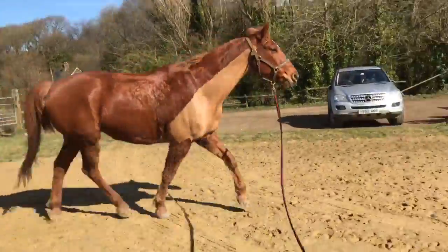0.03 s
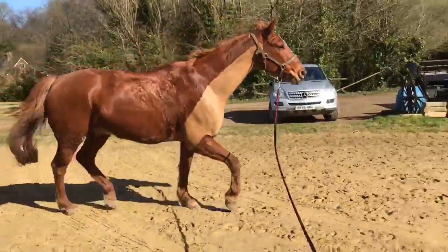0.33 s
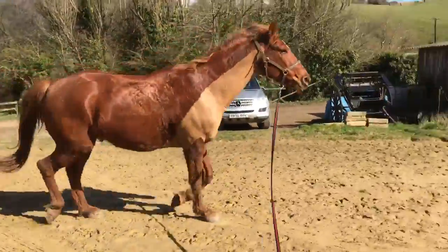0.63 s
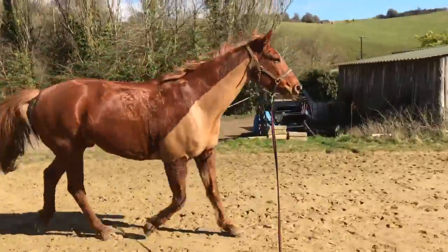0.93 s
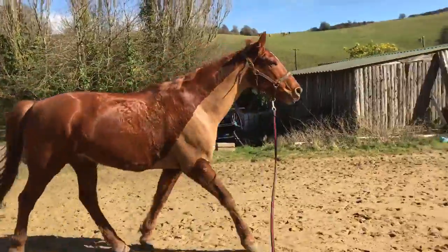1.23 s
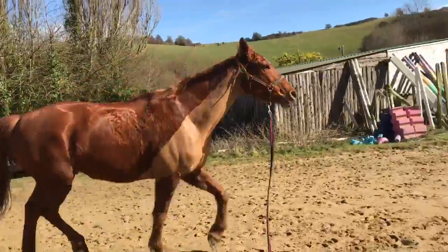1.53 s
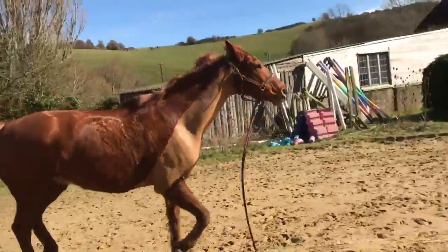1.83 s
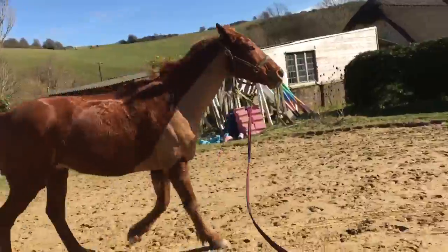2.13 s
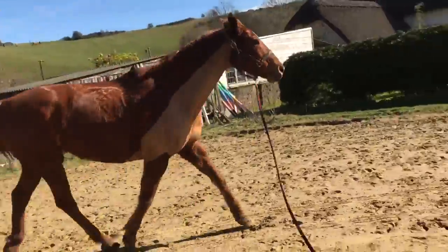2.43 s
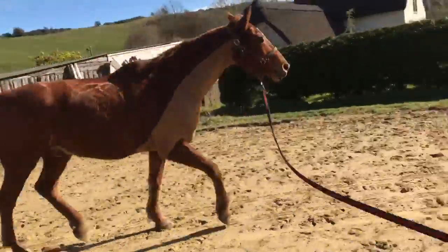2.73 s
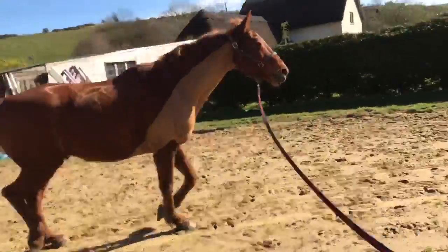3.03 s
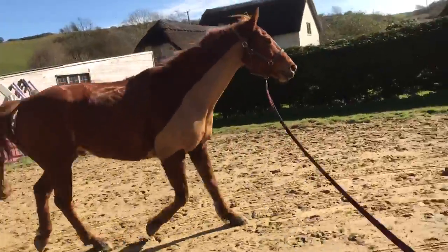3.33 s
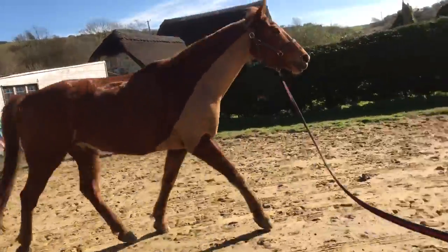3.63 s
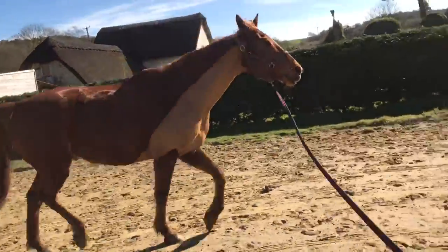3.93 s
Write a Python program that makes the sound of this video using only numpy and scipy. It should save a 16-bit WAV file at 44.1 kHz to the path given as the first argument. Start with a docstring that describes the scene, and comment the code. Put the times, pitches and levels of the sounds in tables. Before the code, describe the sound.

A horse trots on sand close by, over faint outdoor hiss and a low breeze. From 0.3 seconds its hooves land about every 0.4 seconds with soft dull thuds and crunches, with scuffs and pattering sand between. Wind rumbles on the microphone, thumping harder from 1.6 seconds and strongest near the end, at about 4 seconds. A small bird chirps once, faintly, at 2.6 seconds.

```python
"""A horse trots round a sand arena close by. From the start there is outdoor hiss and a low breeze.
Grit clicks, a hoof scuffs and faint far calls begin. From 0.3 s the hooves land with a dull thud and
a crunch, kicked sand falls back, and gusts rumble on the microphone, thumping harder from 1.6 s.
At 2.6 s a small bird chirps once. The wind is strongest near the end, as the horse trots on."""
import sys
import numpy as np
from scipy import signal
from scipy.fft import rfft, irfft, next_fast_len
from scipy.io import wavfile
from scipy.ndimage import uniform_filter1d, map_coordinates

SR = 44100
rng = np.random.default_rng(int(sys.argv[2]) if len(sys.argv) > 2 else 0)


def file_out(sig):
    """Save sig as 16-bit WAV at sys.argv[1]."""
    # one column per channel
    cols = np.atleast_2d(sig).T
    # limit, then scale
    lim = np.clip(cols, -1, 1)
    pcm = np.round(lim * 32767).astype(np.int16)
    wavfile.write(sys.argv[1], SR, pcm)


N = 176400  # 4 seconds
TIME = np.arange(N) / SR


def amp(db):
    """Turn decibels into a number to multiply by."""
    return 10 ** (np.asarray(db) / 20)


def unit(x):
    """Scale a sound to an average (rms) strength of 1."""
    return x / np.sqrt(np.mean(x ** 2) + 1e-20)


def filtered(x, response):
    """Turn each frequency up or down by response(hz)."""
    size = next_fast_len(N + 8192)
    return irfft(rfft(x, size) * response(np.fft.rfftfreq(size, 1 / SR)), size)[:N]


def coloured(x, tone):
    """Shape a sound with a tone table, at strength 1."""
    freqs, db = np.transpose(tone)
    return unit(filtered(x, lambda hz: amp(np.interp(np.log(hz + 1), np.log(freqs + 1), db))))


def noise(tone):
    """Noise with the given tone, at strength 1."""
    return coloured(rng.standard_normal(N), tone)


def wobble(rate):
    """A smooth curve through `rate` random values a second."""
    return map_coordinates(rng.standard_normal(int(N * rate / SR) + 4), [TIME * rate])


def steadied(x, samples):
    """Even out the chance swells in a noise."""
    power = uniform_filter1d(uniform_filter1d(x * x, samples), samples)
    return x / np.sqrt(np.abs(power) + 1e-9)


def swells(rows):
    """A loudness curve of smooth humps (middle [s], length [s], level [dB])."""
    power = np.zeros(N)
    for middle, length, db in rows:
        near = slice(*np.searchsorted(TIME, [middle - 2 * length, middle + 2 * length]))
        power[near] += amp(db) ** 2 * .5 ** ((2 * (TIME[near] - middle) / length) ** 2)
    return np.sqrt(power)


def strikes(rows, rise_s, hold_share=0.55):
    """A loudness curve of hits (start [s], fade time [s], level [dB]) that rise, hold and fade."""
    loudness = np.zeros(N)
    for start, fade_s, db in rows:
        near = slice(*np.searchsorted(TIME, [start, start + 10 * fade_s]))
        age = TIME[near] - start
        fade = np.exp(-np.maximum(age / fade_s - hold_share, 0))
        loudness[near] += amp(db) * np.minimum(age / rise_s, 1) * fade
    return loudness


# how loud the outdoor hiss is (time [s], level [dB])
HISS_LEVEL = [(0, -61.5), (.3, -66), (.48, -66), (.7, -58.5), (.85, -68), (1.2, -66.5), (1.6, -62),
              (2, -65.5), (2.4, -64), (2.8, -65), (3.2, -61), (3.57, -62.5), (3.93, -61.5)]
# the tone of the hiss (frequency [Hz], level [dB])
HISS_TONE = [(290, 7), (500, 1), (839, -1.5), (1200, 5.5), (2570, -3), (3960, -3.5), (4910, -9.5),
             (8850, -11), (10500, -15.5), (12700, -14.5), (15500, -11.5)]

def outdoor_hiss(drift_db=2.87):
    """A soft hiss whose level wanders a little."""
    hiss = noise([(50, -10)] + list(HISS_TONE))
    return hiss * amp(np.interp(TIME, *np.transpose(HISS_LEVEL)) + drift_db * wobble(3.98))


# how strong the breeze is (time [s], level [dB])
BREEZE = [(0, -61.5), (.3, -52.5), (.7, -54.5), (1.1, -50.5), (1.5, -51), (1.8, -47), (2, -56),
          (2.4, -48.5), (2.7, -46), (3.05, -45.5), (3.4, -47), (3.6, -52.5), (3.7, -30.5), (4, -57)]
# gusts on the microphone (middle [s], length [s], rumble [dB], flutter [dB])
GUSTS = [(0.301, 0.035, -41, -44.5), (0.554, 0.027, -48, -52), (.853, 0.04, -41, -53.5),
         (0.895, 0.015, -42, -46.5), (0.946, 0.034, -46, -54), (1.213, 0.029, -37.5, -77),
         (1.264, 0.016, -37.5, -49), (1.573, 0.0073, -45, -31), (1.608, 0.022, -29.5, -35.5),
         (1.664, 0.021, -35.5, -39.5), (1.72, 0.031, -31.5, -46), (2.132, 0.13, -43, -79),
         (2.188, 0.021, -40.5, -49), (2.241, 0.022, -30, -43), (2.305, 0.02, -31.5, -58),
         (2.465, 0.056, -41.5, -52), (2.539, 0.015, -35.5, -38.5), (2.582, 0.036, -29, -39.5),
         (2.74, 0.012, -27, -42.5), (2.785, 0.046, -37, -59), (2.851, 0.035, -31.5, -43),
         (2.932, 0.031, -32, -43.5), (3.166, 0.017, -28, -40), (3.218, 0.031, -31, -72),
         (3.287, 0.023, -33.5, -69), (3.358, 0.023, -43, -37.5), (3.412, 0.047, -32.5, -36),
         (3.477, 0.033, -34.5, -61), (3.534, 0.014, -40.5, -42.5), (3.633, 0.02, -38, -52.5),
         (3.695, 0.012, -29, -31.5), (3.747, 0.024, -35.5, -54), (3.829, 0.031, -25, -37),
         (3.943, 0.039, -39, -54), (4.007, 0.049, -35, -39.5)]
# the tone of the wind's rumble (frequency [Hz], level [dB])
RUMBLE_TONE = [(15, -26), (26, -48), (42, 1), (63, 4.5), (120, -4.5), (200, -17.5), (400, -32.5),
               (800, -46.5), (2000, -78)]
# the tone of its flutter (frequency [Hz], level [dB])
FLUTTER_TONE = [(50, -32), (120, 3), (200, 9.5), (330, -6.5), (550, -18.5), (850, -33), (1500, -78),
                (4000, -77)]

def wind(roughness_db=7, breeze_flutter_db=-13):
    """Air rumbles on the microphone, with a rough, higher flutter when it hits hard."""
    breeze = amp(np.interp(TIME, *np.transpose(BREEZE)))
    gust_rumble = swells([row[:3] for row in GUSTS])
    gust_flutter = swells([(middle, length, db) for middle, length, _, db in GUSTS])
    rumble = np.hypot(breeze, gust_rumble) * steadied(noise(RUMBLE_TONE), samples=1000)
    churn = steadied(noise(FLUTTER_TONE) * amp(roughness_db * wobble(130)), samples=700)
    return rumble + np.hypot(amp(breeze_flutter_db) * breeze, gust_flutter) * churn


# small clicks (time [s], level [dB], pitch [Hz], time to fade by 60 dB [s], pitch sharpness [Q])
CLICKS = [(0.0228, -51, 3730, 0.017, 2), (.047, -60, 6100, 0.083, 2.6), (0.8053, -55, 6000, 0.018, 1),
          (1.1426, -41.5, 3350, 0.022, 3.6), (1.297, -38.5, 6030, 0.0058, 1.2), (1.58, -54, 5000, 0.013, 1),
          (2.816, -54, 9000, 0.019, 0.98), (2.858, -59, 9000, 0.0086, 1.5), (3.99, -54, 4720, .015, 1.2)]

def clicks():
    """Bits of grit and riding gear tap: each is a tiny burst of noise around one pitch."""
    out, age = np.zeros(N + SR), TIME[:2048]
    for start, db, hz, fade_s, sharpness in CLICKS:
        b, a = signal.iirpeak(hz, max(sharpness, 1), SR)
        ring = unit(signal.lfilter(b, a, rng.standard_normal(len(age))))
        out[round(start * SR):][:len(age)] += amp(db - 60 * age / fade_s) * ring
    return out[:N]


def grit(tone, grains_per_s=2200, spread_db=4):
    """Sand grains of uneven size rub together, over an equally strong hiss."""
    hits = (rng.random(N) < grains_per_s / SR) * rng.standard_normal(N)
    sizes = amp(spread_db * np.minimum(rng.exponential(size=N), np.pi))
    return coloured(unit(hits * sizes) + rng.standard_normal(N), tone)


# the tone of loose sand (frequency [Hz], level [dB])
SAND_TONE = [(200, -19), (700, 4.5), (1500, -1), (3600, 4), (6000, 1), (9000, -2), (10400, -9),
             (12500, -2.5), (15500, -11.5)]

def moving_sand(rows, loudness, split_hz=4200):
    """Loose grains follow a loudness curve; finer sand has more treble."""
    grains = grit(SAND_TONE)
    coarse = filtered(grains, lambda hz: 1 / (1 + (hz / split_hz) ** 4))
    fine_rows = [(time, length, db + treble) for time, length, db, treble in rows]
    return coarse * loudness([row[:3] for row in rows]) + (grains - coarse) * loudness(fine_rows)


# hooves dragging (middle [s], length [s], level [dB], extra treble [dB])
SCUFFS = [(.15, 0.056, -56, -6), (.255, 0.047, -62, 4), (.46, 0.17, -75, 7.5), (.565, 0.045, -55.5, -3),
          (.66, 0.053, -54.5, -0.5), (.74, 0.025, -60, 0), (.945, 0.053, -52.5, -7.5),
          (1.025, 0.031, -59, 6), (1.11, 0.065, -58.5, -2.5), (1.2, 0.07, -69, 9), (1.36, .06, -61, -1),
          (1.428, 0.013, -54.5, -2), (1.715, 0.049, -53, -7), (1.822, 0.038, -59, 2.5),
          (2.135, 0.029, -55.5, 1), (2.228, 0.059, -54, -4.5), (2.51, 0.046, -51.5, -10),
          (2.61, 0.049, -57, -0.5), (2.71, 0.049, -58.5, -5.5), (2.94, 0.047, -56, -4.5),
          (3.02, 0.051, -59, 0), (3.1, 0.022, -55, 0), (3.33, 0.059, -54, -7.5), (3.42, 0.025, -59, 0.5),
          (3.66, 0.072, -60, -2), (3.715, .035, -54.5, -16), (3.77, 0.028, -57.5, -3),
          (3.816, 0.022, -60, 8)]

def scuffs():
    """A hoof drags through the sand, so the rubbing swells and fades."""
    return moving_sand(SCUFFS, swells)


# faint calls (middle [s], length [s], pitch [Hz], level [dB])
FAR_CALLS = [(0.153, 0.02, 3000, -61), (0.497, .09, 1460, -68.5), (.87, 0.034, 2850, -75),
             (1.14, 0.1, 2140, -67), (1.29, 0.1, 1810, -68.5), (2.33, 0.29, 1560, -65),
             (2.552, .1, 1430, -68), (3.202, 0.064, 1860, -63), (3.235, 0.035, 1580, -66.5),
             (3.357, 0.045, 970, -61.5), (3.694, 0.037, 1900, -59)]

def far_calls(width_share=.15):
    """Distance blurs each call into a swell of noise around its pitch."""
    out = np.zeros(N)
    for middle, length, pitch, db in FAR_CALLS:
        hiss = rng.standard_normal(N)
        band = filtered(hiss, lambda hz: 1 / (1 + ((hz / pitch - 1) / width_share) ** 2) ** 2)
        out += swells([(middle, length, db)]) * unit(band)
    return out


# hooves landing (start [s], fade time [s], thud [dB], crunch [dB])
HOOVES = [(0.277, 0.011, -46, -45.5), (.391, 0.0063, -53, -65), (.645, 0.011, -49.5, -68),
          (0.682, 0.0044, -45, -53), (1.034, 0.013, -45, -54.5), (1.435, 0.009, -37, -47),
          (1.799, 0.026, -55, -61.5), (2.231, 0.011, -37.5, -43), (2.626, 0.011, -52.5, -62),
          (2.997, 0.0086, -43, -49), (3.404, 0.02, -50, -60), (3.813, 0.0091, -45, -48)]
# the tone of the thud (frequency [Hz], level [dB])
THUD_TONE = [(30, -38), (80, -11), (200, 12), (450, 2.5), (750, 2.5), (1200, -11.5), (2500, -51),
             (8000, -53)]
# the tone of the crunch (frequency [Hz], level [dB])
CRUNCH_TONE = [(200, -53), (700, 0.5), (1500, -1.5), (2500, -1.5), (4000, -0.5), (7500, -9), (10500, -11.5),
               (15000, -21.5)]

def footfalls(rise_s=0.0037):
    """Each hoof packs the ground with a dull thud and crunches the sand."""
    thuds = strikes([row[:3] for row in HOOVES], rise_s)
    crunches = strikes([(start, fade_s, db) for start, fade_s, _, db in HOOVES], rise_s)
    return thuds * steadied(noise(THUD_TONE), samples=400) + crunches * grit(CRUNCH_TONE)


# sand landing (start [s], fade time [s], level [dB], extra treble [dB])
SPRAYS = [(.332, .011, -53.5, 2.5), (.372, 0.0057, -63, 11), (.391, 0.005, -47, -5), (.686, .005, -52, 6),
          (.78, 0.0052, -50.5, -3), (1.466, 0.016, -53, 4.5), (1.499, 0.0095, -55.5, 5.5),
          (1.513, 0.0053, -52, 3), (1.548, 0.0058, -53, 7), (1.891, 0.0083, -51.5, -4),
          (2.193, 0.0092, -53, 4.5), (2.292, 0.021, -58.5, 1), (2.335, 0.016, -67, 11),
          (3.056, 0.0063, -47.5, -7), (3.52, 0.0054, -51, 6.5), (3.863, 0.0098, -51, -2)]

def kicked_sand():
    """Sand thrown up by a hoof lands in a short, sudden patter."""
    return moving_sand(SPRAYS, lambda rows: strikes(rows, rise_s=.005))


# swirls of air (middle [s], length [s], level [dB], upper frequency [Hz])
SWIRLS = [(0.853, 0.0086, -36, 405), (1.573, 0.0087, -27.5, 402), (1.581, 0.0069, -37, 570),
          (1.603, 0.0038, -35.5, 940), (1.712, 0.01, -30.5, 574), (2.537, 0.01, -34.5, 377),
          (2.574, 0.0064, -23, 320), (2.588, 0.0084, -36.5, 448), (2.905, 0.011, -40.5, 580),
          (3.169, 0.0067, -34.5, 354), (3.388, 0.0053, -32.5, 560), (3.703, 0.0052, -29.5, 834),
          (3.752, 0.006, -34.5, 595), (3.823, 0.0075, -30, 630), (3.842, 0.0085, -38, 600),
          (3.981, 0.0085, -34.5, 670)]

def wind_thumps(low_share=0.11):
    """Each swirl of air slaps the microphone with a short, low burst, some duller, some brighter."""
    out, t = np.zeros(N + SR), TIME[:8192]
    hz, centre = np.fft.rfftfreq(len(t), 1 / SR), t.mean()
    for middle, length, db, top_hz in SWIRLS:
        treble_cut = (1 + (hz / top_hz) ** 10) * (1 + (2 * hz / top_hz) ** 2)
        bass_cut = 1 + (low_share * top_hz / (hz + 1)) ** 4
        hump = .5 ** (2 * ((t - centre) / length) ** 2)
        burst = hump * irfft(rfft(rng.standard_normal(len(t))) / np.sqrt(treble_cut * bass_cut))
        burst *= np.linalg.norm(hump) / np.linalg.norm(burst)  # as much energy as the hump
        out[round((middle - centre) * SR):][:len(t)] += amp(db) * burst
    return out[:N]


# the path of the bird's whistle (time [s], pitch [Hz], level [dB])
CHIRP = [(2.63, 3510, -66), (2.643, 4020, -53.5), (2.65, 4440, -53), (2.664, 4410, -55.5),
         (2.679, 4420, -57), (2.695, 4420, -74)]

def bird(echo_db=-6, echo_s=0.53, blur_hz=88):
    """One rising whistle with a short, blurred echo from the yard."""
    times, hz, db = np.transpose(CHIRP)
    loudness = amp(np.interp(TIME, times, db, left=-200, right=-200))
    phase = 2 * np.pi * np.cumsum(np.interp(TIME, times, hz)) / SR
    note = np.sqrt(2) * loudness * np.sin(phase)
    tail = rng.standard_normal(SR // 2) * amp(-60 * TIME[:SR // 2] / echo_s)
    echo = signal.hilbert(signal.fftconvolve(note, tail / np.linalg.norm(tail))[:N])
    blur = np.exp(2j * np.pi * np.cumsum(blur_hz * wobble(400)) / SR)  # shakes the echo's pitch
    return note + amp(echo_db) * (echo * blur).real


def scene():
    """Add the horse, the wind and the surroundings into one channel."""
    horse = footfalls() + scuffs() + kicked_sand() + clicks()
    return (horse + wind() + wind_thumps() + bird() + outdoor_hiss() + far_calls())[None]


def record(dry, top_hz=15850):
    """Cut away the very highest treble."""
    return np.array([filtered(channel, lambda hz: hz < top_hz) for channel in dry])


dry = scene()
out = record(dry)
file_out(out)
```